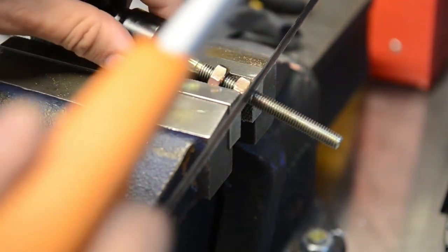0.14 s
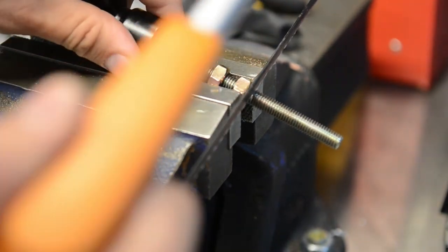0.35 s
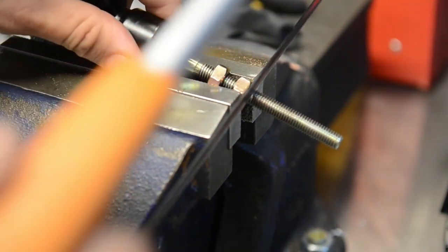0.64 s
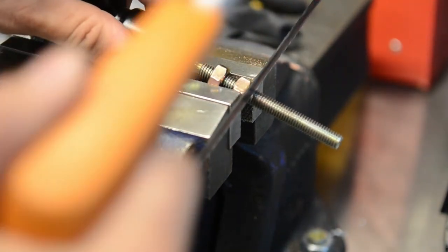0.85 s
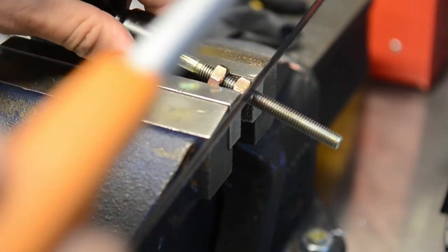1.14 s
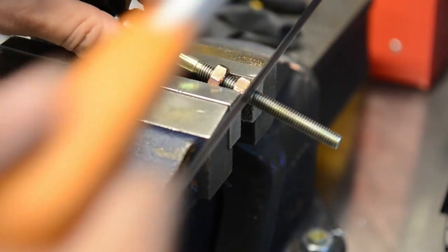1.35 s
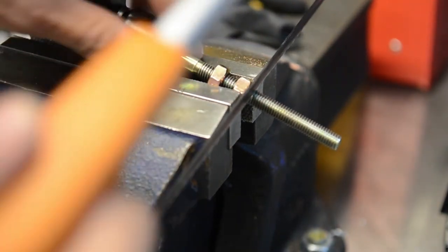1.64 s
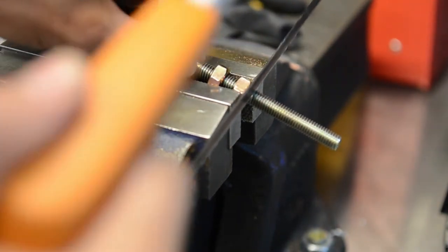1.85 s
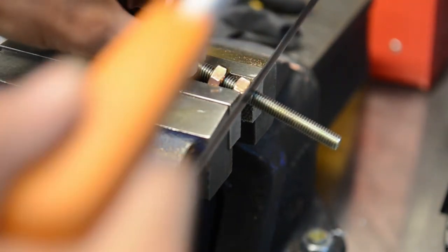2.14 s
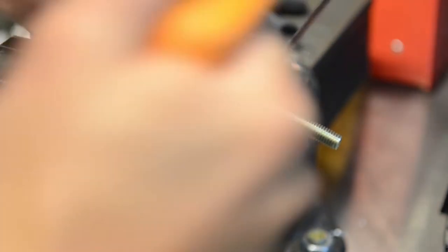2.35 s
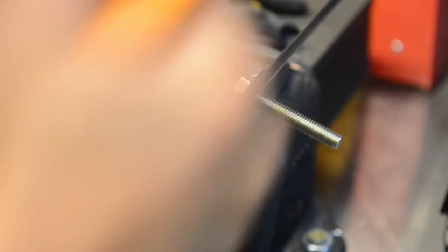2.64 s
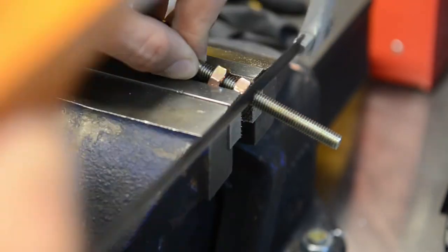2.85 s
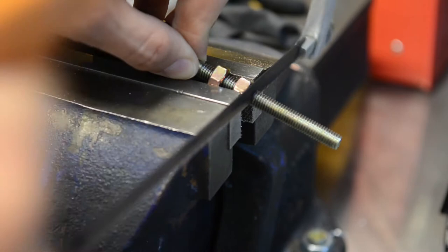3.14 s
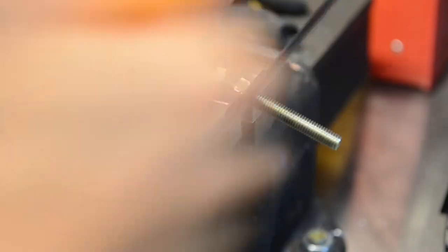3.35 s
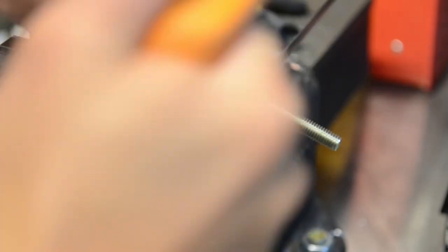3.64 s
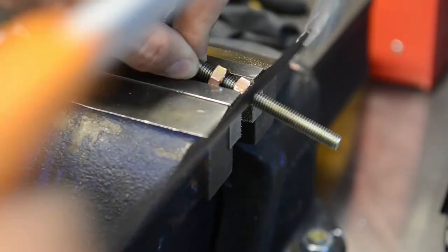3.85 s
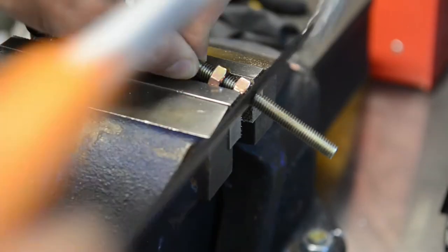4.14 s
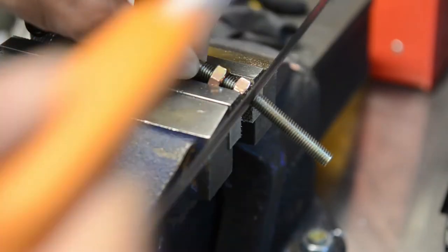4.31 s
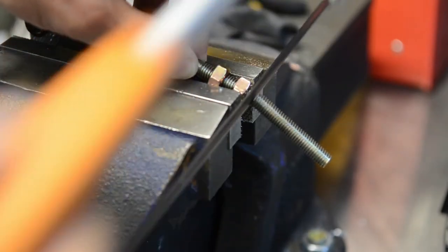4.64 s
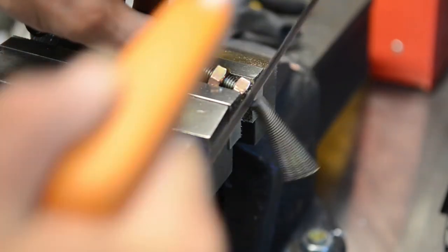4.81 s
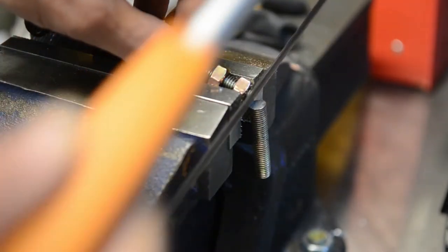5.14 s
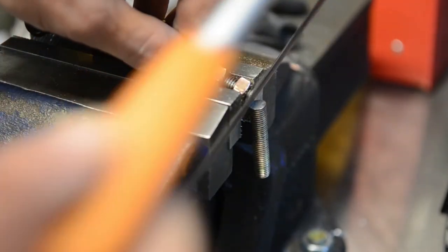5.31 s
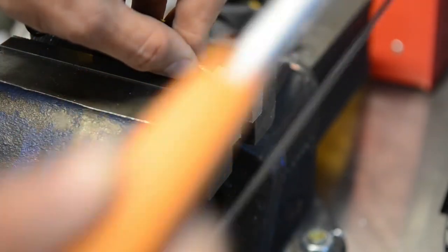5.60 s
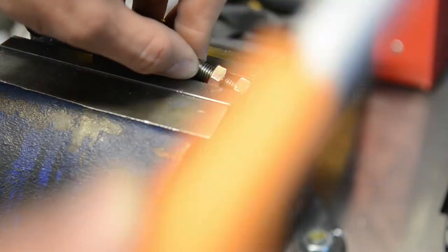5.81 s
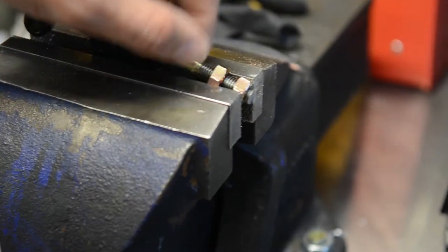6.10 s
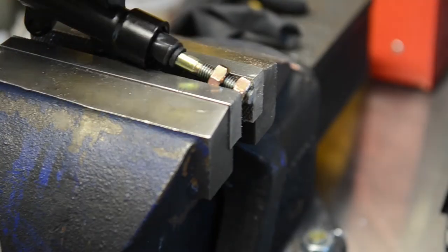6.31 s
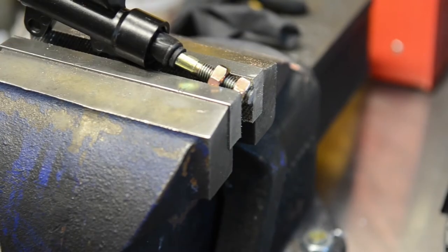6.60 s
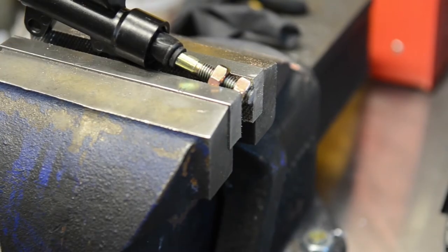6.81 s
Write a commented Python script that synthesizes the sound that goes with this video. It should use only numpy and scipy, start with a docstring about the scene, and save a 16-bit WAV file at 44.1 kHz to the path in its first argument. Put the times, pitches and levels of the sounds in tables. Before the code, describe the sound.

Quick, quiet hacksaw strokes turn into long, loud, squawking rasps through a steel rod, then a skid, a clank and dull knocks in a workshop.

```python
"""A hacksaw rasps through a threaded steel rod in a bench vise, over still air: sped-up strokes an octave
higher and quieter, with one small tick amid them, then longer, louder ones. Each stroke is noise and tooth
ticks shaped by the blade's tones, with short squawks and a bench rumble. The blade skids free as ringing
noise; the cut end tumbles with a thin high warbling tone and knocks. The saw clanks on the vise with fading
tones, small ticks settle, and dull knocks follow further off, echoing in the hard-walled workshop."""
import sys
import numpy as np
from scipy import signal
from scipy.fft import rfft, irfft, next_fast_len
from scipy.io import wavfile
from scipy.ndimage import uniform_filter1d

SR = 44100
rng = np.random.default_rng(int(sys.argv[2]) if len(sys.argv) > 2 else 0)


def transcribe(u):
    """Save the signal u as a 16-bit wav file named by the first command-line argument.

    u: samples, shape (n,) or (channels, n), limited to [-1, 1]; the rate is SR.
    q: integer samples, one column per channel.
    """
    v = np.clip(np.atleast_2d(u).T, -1, 1)
    q = np.round(v * 32767).astype(np.int16)
    wavfile.write(sys.argv[1], SR, q)


N = 306936  # samples in the scene
HZ = np.fft.rfftfreq(next_fast_len(N + SR), 1 / SR)  # pitches at which filters are worked out

# still air of the shop: (pitch [Hz], relative strength [dB])
AIR_SHAPE = [(60, -40), (100, -3.5), (160, -15.5), (270, -14.5), (430, -15.5), (650, -14), (1740, -18),
             (4000, -32.5), (12000, -49), (16000, -84.5)]
AIR_DB = -60.5
# how each pitch dies away in the workshop: (pitch [Hz], time to fall by 60 dB [s])
ROOM_FADES = [(150, 0.4), (600, 0.37), (1700, 0.35), (4600, 0.3), (9000, .28), (12000, 0.26),
              (15000, 0.066)]

# saw strokes, pushes and pulls in turn: (turn time [s], level at the crest before unevenness [dB])
STROKES = [(0.025, -54), (0.113, -51), (0.194, -49.5), (0.29, -46), (0.37, -42), (0.457, -52), (0.535, -46),
           (0.626, -41.5), (0.708, -41.5), (0.795, -40.5), (0.872, -38.5), (0.962, -40), (1.046, -37.5),
           (1.134, -31.5), (1.227, -32.5), (1.309, -34), (1.397, -40.5), (1.492, -46.5), (1.548, -45),
           (1.632, -53.5), (1.7, -46.5), (1.778, -43), (1.861, -41.5), (1.936, -39.5), (2.011, -40.5),
           (2.098, -41.5), (2.174, -42), (2.234, -27.5), (2.347, -25), (2.519, -28.5), (2.681, -24.5),
           (2.85, -28.5), (2.998, -22), (3.168, -27.5), (3.311, -25), (3.48, -26), (3.633, -23.5),
           (3.809, -26.5), (3.941, -23), (4.105, -31), (4.254, -34), (4.408, -38), (4.55, -33),
           (4.677, -35.5), (4.822, -33), (4.966, -39), (5.1, -41), (5.229, -44.5), (5.354, -50.5),
           (5.445, -61)]
LONG_FROM_S, SAW_ENDS_S = 2.233, 5.49
# strokes one way, then the other: (crest as share of the stroke [0-1], chips against the crest [dB],
# teeth passing at full speed [Hz], extra bench rumble [dB], extra level at the turn [dB])
QUICK_WAYS = [(.55, -0.3, 2100, -1.5, 1.5), (0.3, -1.5, 2300, 1, 2)]
LONG_WAYS = [(.45, -4, 1443, 1.2, 1.2), (.55, -8.5, 876.1, -0.64, -1.2)]
# what still sounds while the blade turns round: (time [s], level [dB])
TURN_LEVELS = [(0, -59), (.37, -57), (.457, -48.5), (.535, -66), (.63, -53), (1, -47), (1.3, -40.5),
               (1.68, -56), (1.8, -51), (2.2, -47), (2.234, -28.5), (2.35, -38), (3.5, -36), (4.1, -35),
               (4.4, -43.5), (4.8, -41.5), (5.23, -51), (5.4, -38)]
# sharp starts and bumps within strokes: (time [s], brief change in level [dB])
BUMPS = [(0.407, 6), (.477, 14), (.57, 3), (.753, 6), (1.422, 7), (1.72, 2.5), (1.79, 4), (1.875, -2),
         (3.202, 6.5), (4.132, 4), (4.157, 1)]
# how gritty the cut is as it deepens: (time [s], added to the chips [dB])
GRITTINESS = [(0, -6), (.4, -3), (.8, 0.5), (1.5, -2), (1.75, 0.5), (2.22, 2.5), (2.25, 1.5), (3, 1),
              (4.3, -.5), (5.3, 0.5), (5.4, 2.5)]
# level of the bench rumble: (time [s], level [dB])
RUMBLE_LEVELS = [(0, -55.5), (.44, -49.5), (.58, -59), (.66, -48), (1, -49), (1.25, -46.5), (2.22, -53),
                 (2.28, -37), (2.6, -31.5), (3.1, -38), (3.9, -31.5), (4.3, -38.5), (4.6, -54), (4.8, -46),
                 (5.15, -54.5), (5.45, -52.5)]
# tones of blade and frame, before a pitch factor for each kind of stroke:
# (pitch [Hz], width [Hz], strength in long strokes [dB], strength in quick strokes [dB])
BLADE_MODES = [(870, 45, 6, 6), (1068, 25, 5, 2), (1240, 25, 1, 3), (1442, 30, -1, -4), (1750, 60, -1, -2),
               (1910, 45, 4, -2), (2115, 30, 5, -2), (2790, 80, -3, 0), (2965, 50, 0, -2),
               (3990, 45, 0, -4)]
# broad rasp between those tones: (pitch [Hz], relative power per hertz [dB])
QUICK_BODY = [(210, -37), (350, 0), (610, -12), (754, -4), (1230, -3.5), (1740, 3), (1960, -1), (2480, -1),
              (3130, -5.5), (4140, -13), (4570, -7.5), (5000, -29), (6500, -50), (11000, -120)]
LONG_BODY = [(210, -57), (350, -15.5), (667, -7), (872, 1), (1080, 4.5), (1160, -2.5), (1350, -4),
             (1720, -0.5), (2100, 3.5), (2370, -5.5), (2770, -0.5), (3170, -9.5), (5000, -22),
             (6500, -56.5), (11000, -120)]
# hiss of chips tearing off: (pitch [Hz], relative power per hertz [dB])
QUICK_GRIT = [(1760, -30), (3000, -8), (3130, -61), (3500, -2), (4140, 1), (4630, -14.5), (5600, 6),
              (6170, -5.5), (6390, -10.5), (8700, -11), (11300, -22), (15000, -15), (16000, -24)]
LONG_GRIT = [(1760, -50), (3000, 0), (3170, -5), (4110, -6.5), (5000, -8.5), (5400, -14), (6670, -8.5),
             (7510, -8.5), (9460, -18.5), (13500, -28.5), (16000, -40)]
# vise and bench shaking: (pitch [Hz], relative power per hertz [dB])
QUICK_RUMBLE = [(15, -71), (25, -39), (48, -24), (119, -1), (208, 1.5), (253, -7), (354, -3.5), (617, -9.5),
                (700, -6.5), (910, -8), (1540, -120)]
LONG_RUMBLE = [(47, -33), (80, -1), (134, -5), (171, 4), (200, -1), (306, -5), (371, -1.5), (568, -5.5),
               (700, -4), (910, 3.5), (1540, -120)]

# loud chatter, teeth in step with one tone of the blade:
# (time [s], length [s], pitch [Hz], peak level before roughness [dB])
SQUAWKS = [(0.331, 0.017, 2496, -43.5), (0.73, 0.022, 1760, -53), (0.824, 0.0099, 2530, -36.5),
           (1.013, 0.017, 2680, -39.5), (1.086, 0.02, 1650, -38), (1.256, 0.032, 1740, -30),
           (1.343, 0.022, 1993, -35.5), (1.344, 0.041, 1724, -41), (1.441, 0.015, 1670, -47),
           (1.741, 0.028, 1766, -47), (1.795, 0.024, 1790, -36.5), (1.969, 0.02, 1767, -44),
           (2.07, 0.012, 2120, -34.5), (2.136, 0.041, 1770, -46), (2.253, 0.027, 840, -20.5),
           (2.32, 0.04, 828, -26.5), (2.428, 0.03, 2060, -23), (2.451, 0.026, 880, -17.5),
           (2.568, 0.016, 904, -18.5), (2.78, 0.028, 860, -17.5), (2.922, 0.013, 1460, -20),
           (2.938, 0.013, 1085, -22.5), (3.105, 0.021, 874, -14), (3.206, 0.014, 880, -21),
           (3.245, 0.037, 1486, -28), (3.41, 0.033, 880, -22.5), (3.561, 0.013, 1436, -11.5),
           (3.71, 0.019, 1061, -21.5), (3.743, 0.019, 862, -20), (3.747, 0.027, 1908, -21.5),
           (3.879, 0.013, 1423, -16), (3.901, 0.019, 1098, -16), (3.997, 0.038, 971, -26),
           (4.021, 0.037, 880, -23.5), (4.163, 0.025, 951.4, -22), (4.306, 0.016, 886, -29),
           (4.451, 0.021, 984, -38.5), (4.624, 0.043, 1910, -37.5), (4.699, 0.0069, 944, -39),
           (4.901, 0.041, 1850, -43), (5.01, 0.015, 930, -41.5), (5.129, 0.037, 1250, -43.5)]
FAINT_DB, FAINT_S = -3, .028  # faint chatter: dB against the stroke's crest, length before chance

# small ticks, one amid the quick strokes, the rest as things settle:
# (time [s], level [dB], centre pitch [Hz], room against the click [dB])
TICKS = [(1.693, -44, 10000, 3), (5.994, -45, 9000, 28), (6.122, -52, 8060, 18), (6.149, -48, 8000, 15),
         (6.248, -41, 1140, 11), (6.35, -61, 8920, 8)]

# sway of the bench: (time [s], level before the dip [dB])
SWAY_LEVELS = [(2.241, -55.5), (2.6, -41), (2.95, -44.5), (3.25, -46), (3.6, -53), (3.95, -43),
               (4.4, -55.5), (5, -50.5), (5.49, -61), (5.75, -76.5)]
SWAY_DIP_DB = -10

# the blade out of the cut: (pitch [Hz], width [Hz], strength [dB])
FREE_BLADE_MODES = [(1385, 50, -5.5), (2100, 29, 5.5), (2490, 40, -5), (2970, 33, -2), (3260, 80, -8),
                    (3480, 74, -15), (4300, 179, -16), (5390, 43, -14), (6260, 29, -9), (6660, 62, -15),
                    (6970, 28, -14), (7550, 29, -11), (8300, 230, -23), (9100, 65, -19), (9400, 32, -18.5),
                    (10800, 66, -24)]
# push on the skidding blade: (time [s], level before flicker [dB])
SKID_PUSH = [(5.345, -71), (5.36, -39.5), (5.4, -36), (5.415, -39), (5.43, -38.5), (5.445, -43),
             (5.455, -36), (5.49, -62)]

# ring of the tumbling cut end, split by its spin:
# (time [s], level before flutter [dB], average split each way [Hz])
END_RING = [(5.43, -45, 22), (5.51, -51, 28), (5.63, -43.5, 28), (5.66, -53, 43), (5.861, -59, 137),
            (5.9, -71, 150), (5.985, -56, 230), (6.0, -38, 121), (6.04, -51, 100), (6.124, -40, 25.9),
            (6.16, -57, 21), (6.18, -48, 22), (6.37, -80, 14.6), (6.474, -67, 11), (6.55, -92, 12)]
RING_HZ = 12742

# knocks of the cut end, then those further off: (time [s], relative level [dB], relative treble [dB],
# relative bass [dB], favoured pitch [Hz], relative ring [dB])
CUT_KNOCKS = [(5.4923, -8, -17.5, -38.5, 1180, -10), (5.5215, -29, 2.5, -33, 2220, -19)]
FAR_KNOCKS = [(6.5606, -3.5, -33, -16.5, 1624, -16), (6.5675, -17.5, -37, -23, 900, -19),
              (6.5937, -22.5, -18.5, 0, 1220, -20.5), (6.602, -40, -36, -19, 1230, -14),
              (6.639, -17, -34, -15, 1230, -21), (6.7963, -22.5, -19.5, 6.5, 1370, -21),
              (6.8307, -8, -38, -2, 1480, -11.5), (6.834, -12.5, -47, -21, 584, -11.5),
              (6.842, -29, -42, 1, 1300, -7.5), (6.849, -32, -38, -9, 264, -11.5),
              (6.874, -14, -26.5, 0, 1490, -9.5), (6.899, -16.5, -41, -19, 710, -23),
              (6.93, -18.5, -28.5, -12, 1240, -23)]
# tones of what is struck: (pitch [Hz])
CUT_MODES_HZ = [1190, 2100]
FAR_MODES_HZ = [279, 570, 720, 900, 1216, 1320, 1495, 1620]
# lower and upper edges of each kind of click
CUT_LOW_HZ, CUT_HIGH_HZ = 690, 2850
FAR_LOW_HZ, FAR_HIGH_HZ = 413, 1985
BOOM_HZ, BOOM_T60_S = 91.6, 0.57
SHOULDER_HZ, SHOULDER_DB = 3970, -28  # a weak upper step of the click
FAVOUR_OCTAVES, CRACK_DB = 0.13, 11  # reach of the favoured pitch; crack over the treble of the blow

# saw frame on the vise, the snap and the long ring:
# (pitch [Hz], starting strength [dB], time to fall by 60 dB [s])
FRAME_MODES = [(854, 6.5, 0.0057), (1130, -15, 0.025), (1800, -11.5, 0.026), (2540, -6, 0.013),
               (3235, 5.5, 0.011), (4100, -12.5, 0.013), (5580, -18, .004), (7130, -22.5, .005),
               (8400, -23, .004), (9800, -7.5, 0.0015), (11500, -15.5, 0.0029), (14840, -29, .005),
               (1075, -47, 1.38), (1770, -51, 1), (2660, -53.5, 1.2), (2826, -49.5, 0.75),
               (3210, -43, 0.42), (3330, -47.5, 1.27), (168, -34, 0.27), (216, -35.5, 0.32),
               (272, -36, 0.25), (362, -25.5, 0.11), (107, -50.5, 1.1), (58.3, -48, 1.3)]
CLANK_S, CLANK_DB = 5.9188, 0.5

EDGE_HZ, OFFSET = 16280, .0006  # upper band limit; steady shift of the waveform


def gain_of(db):
    """Turns decibels into a plain multiplier."""
    return 10 ** (np.asarray(db) / 20)


def evened(x):
    """Scales to an average (rms) strength of 1."""
    return x / np.sqrt(np.mean(abs(x) ** 2) + 1e-20)


def read(points, hz):
    """Reads between the points of a table, along log frequency."""
    f, value = np.transpose(points)
    return np.interp(np.log(hz + 1), np.log(f + 1), value)


def over_time(points, t):
    """Reads between the points of a (time, value) table."""
    return np.interp(t, *np.transpose(points))


def colour(x, response):
    """Filters by a response given on HZ, scaled to unit power."""
    return irfft(rfft(x, 2 * len(HZ) - 2) * evened(response))[:N]


def mode(hz, width):
    """Filter of one ringing tone, with peak gain 1: the narrower, the longer it rings."""
    return 1 / (1 + 2j * (HZ - hz) / width)


def wander(seconds):
    """Smooth chance of rms 1 that changes within the given time."""
    size = max(round(seconds * SR), 2)
    once = uniform_filter1d(rng.standard_normal(N), size)
    return evened(uniform_filter1d(once, size))


def placed(s, sound):
    """Sets a sound at time s in silence."""
    return np.append(np.zeros(round(s * SR)), np.append(sound, np.zeros(N)))[:N]


def patchy(x, depth_db, frames, bins):
    """Uneven noise: chance patches of louder and softer over time and pitch."""
    z = signal.stft(x, nperseg=1024, noverlap=768)[2]
    field = uniform_filter1d(rng.standard_normal(z.shape), bins, 0)
    field = evened(uniform_filter1d(field, frames, 1))
    gain = gain_of(depth_db * field)
    return signal.istft(z * evened(gain), nperseg=1024, noverlap=768)[1][:N]


def room():
    """Dense reflections, each band dying at its own speed, energy 1."""
    size = 3 * SR // 4
    hz, t, z = signal.stft(rng.standard_normal(size), SR, nperseg=256, noverlap=128)
    fade = gain_of(-60 * t / read(ROOM_FADES, hz)[:, None])
    tail = signal.istft(z * fade, SR, nperseg=256)[1][:size]
    tail *= 1 - np.exp(-np.arange(size) / (0.00027 * SR))  # soft start
    return np.append(tail, np.zeros(SR - size)) / np.linalg.norm(tail)


def still_air():
    """Quiet steady noise for the air of the shop."""
    return gain_of(AIR_DB) * colour(rng.standard_normal(N), gain_of(read(AIR_SHAPE, HZ)))


def bumps():
    """Sudden changes of level that die away within hundredths of a second: dB over time."""
    t = np.arange(1500) / SR
    return sum(placed(s, db * np.exp(-t / 0.0106)) for s, db in BUMPS)


def strokes(rows, start_s, end_s, pitch_factor, column, ways, body, grit, rumble,
            teeth_db, lumps_db, bite, lift, slack_db):
    """Teeth tick past the rod at a rate that follows the blade speed; torn chips hiss, the bench rumbles."""
    turn_s, crest_db = np.transpose(rows)
    share, grit_db, teeth_hz, rumble_db, turn_db = np.resize(ways, (len(rows), 5)).T
    t = np.arange(N) / SR

    # blade motion: still at each turn, fastest at each crest
    length_s = np.minimum(np.diff(turn_s, append=end_s), 1.15 * np.median(np.diff(turn_s)))
    crest_s = turn_s + np.clip(share, .1, .9) * length_s
    knots = np.append(np.ravel([turn_s, crest_s], "F"), end_s)
    travel = np.interp(t, knots, np.arange(len(knots)) / 2)  # one unit a stroke
    speed = abs(np.sin(np.pi * travel))
    now = np.minimum(travel.astype(int), len(rows) - 1)
    live = uniform_filter1d(1. * (t > start_s) * (t < end_s), 40)

    # the teeth lift clear near the turn
    rest_db = np.interp(t, turn_s, turn_db + over_time(TURN_LEVELS, turn_s))
    contact = np.clip((speed - lift) / (1 - lift), 0, 1) ** bite
    level_db = rest_db + (crest_db[now] - rest_db) * contact
    catch = gain_of(lumps_db * wander(0.00787) + bumps())  # the teeth catch unevenly

    # one tick of chance size a tooth, over a scrape
    passed = np.cumsum(teeth_hz[now] * speed ** .35 * (1 + .03 * wander(.01))) / SR
    tooth_passes = np.diff(np.floor(passed), prepend=0)
    teeth = evened(tooth_passes * (1 + 1.35 * rng.standard_normal(N)))
    grain = evened(gain_of(1.37 * wander(0.00038)))  # single chips stand out of the scrape
    scrape = rng.standard_normal(N) * grain + gain_of(teeth_db) * teeth

    modes = sum(abs(gain_of(m[column]) * mode(pitch_factor * m[0], pitch_factor * m[1])) ** 2
                for m in BLADE_MODES)
    ringing = gain_of(read(body, HZ)) * np.sqrt(1 + modes)
    rasp = colour(scrape * catch * gain_of(level_db), ringing)
    rasp = patchy(rasp, depth_db=3.0, frames=5, bins=4) * live

    chips_db = level_db + np.interp(t, crest_s, grit_db) + over_time(GRITTINESS, t)
    chips_db -= slack_db * (1 - contact)  # slow blade, fewer chips
    chips = rng.standard_normal(N) * np.sqrt(catch) * grain * live * gain_of(chips_db)
    chips = colour(chips, gain_of(read(grit, HZ)))
    chips = patchy(chips, depth_db=3.5, frames=6, bins=3) * live

    shake_db = over_time(RUMBLE_LEVELS, t) + np.interp(t, crest_s, rumble_db) + 1.4 * (speed - 1)
    shaking = rng.standard_normal(N) * live * gain_of(shake_db)
    return rasp + chips + colour(shaking, gain_of(read(rumble, HZ)))


def saw():
    """Sped-up strokes ring an octave above the blade table, the long ones after them just below it."""
    quick = [row for row in STROKES if row[0] < LONG_FROM_S]
    early = strokes(quick, 0, LONG_FROM_S, pitch_factor=2, column=3, ways=QUICK_WAYS,
                    body=QUICK_BODY, grit=QUICK_GRIT, rumble=QUICK_RUMBLE,
                    teeth_db=-21.5, lumps_db=0.5, bite=0.59, lift=0.35, slack_db=7.0)
    late = strokes(STROKES[len(quick):], LONG_FROM_S, SAW_ENDS_S, pitch_factor=0.98, column=2,
                   ways=LONG_WAYS, body=LONG_BODY, grit=LONG_GRIT, rumble=LONG_RUMBLE,
                   teeth_db=-8, lumps_db=0.5, bite=0.94, lift=0.038, slack_db=6.0)
    return early + late


def faint_chatter():
    """Picks a chance blade tone for each stroke but the first and last, in rows like SQUAWKS."""
    turn_s, crest_db = np.transpose(STROKES)
    when, which, size = rng.random((len(STROKES), 3)).T
    picked = (which * len(BLADE_MODES) * .7).astype(int)
    octave = np.where(turn_s < LONG_FROM_S, 2 - (which > .5), 1)  # low picks go up in quick strokes
    hz = np.array(BLADE_MODES)[picked, 0] * octave
    s = turn_s + np.gradient(turn_s) * (.3 + .4 * when)
    return list(zip(s, FAINT_S * (.6 + 1.0 * size), hz, crest_db + FAINT_DB))[1:-1]


def squawks():
    """Short unsteady tones that swell fast, sag in pitch as the stroke slows and die with the mode."""
    out, wobble, rough = np.zeros(N), wander(0.017), wander(0.0021)
    for s, length, hz, db in SQUAWKS + faint_chatter():
        at = np.arange(round((s - 2 * length) * SR), round((s + 4 * length) * SR))
        u = (at / SR - s) / length  # time from the peak, in lengths
        swell = np.exp(-(u / np.where(u < 0, .55, 1.05)) ** 2) * gain_of(db + 3.96 * rough[at])
        turns = np.cumsum(hz * (1 - 0.0123 * u + 0.0087 * wobble[at])) / SR
        out[at] += swell * (np.sin(2 * np.pi * turns) + 0.11 * np.sin(4 * np.pi * turns))
    return out + gain_of(-9) * signal.fftconvolve(out, room())[:N]


def ticks():
    """Millisecond clicks of noise, each with its own share of room."""
    out, t, f = np.zeros(N), np.arange(SR) / SR, np.fft.rfftfreq(SR, 1 / SR)
    for s, db, hz, room_db in TICKS:
        click = rng.standard_normal(SR) * np.exp(-t / 0.0013) + gain_of(room_db) * room()
        band = evened(1 / (1 + 1.2j * (f - hz) / hz) ** 2)
        out += placed(s, gain_of(db) * irfft(rfft(click) * band))
    return out


def sway():
    """The bench sways as narrow low noise that swells on every second stroke."""
    t = np.arange(N) / SR
    travel = np.interp(t, np.transpose(STROKES)[0], np.arange(len(STROKES)))
    dip_db = SWAY_DIP_DB * np.sin(np.pi * (travel - .55) / 2) ** 2
    live = (t > SWAY_LEVELS[0][0]) * (t < SWAY_LEVELS[-1][0])
    push = rng.standard_normal(N) * gain_of(over_time(SWAY_LEVELS, t) + dip_db) * live
    return colour(push, mode(63.5, 30) ** 2)


def skid():
    """Scraping noise, partly bare, partly into the narrow modes of the freed blade."""
    t = np.arange(N) / SR
    live = (t > SKID_PUSH[0][0]) * (t < SKID_PUSH[-1][0])
    push = gain_of(over_time(SKID_PUSH, t) + 4.1 * wander(0.0029)) * live * rng.standard_normal(N)
    bare = gain_of(-23) / (1 + 1j * HZ / 7000) ** 2
    modes = sum(gain_of(db) * mode(hz, width) for hz, width, db in FREE_BLADE_MODES)
    return patchy(colour(push, bare + modes), depth_db=3.5, frames=3, bins=12)


def cut_end():
    """One high bar mode; the spin turns it to and from the ear, so it splits the more the faster it turns."""
    s, level_db, split_hz = np.transpose(END_RING)
    t = np.arange(N) / SR
    spin_hz = np.interp(t, s, split_hz)
    spin = np.cumsum(spin_hz * (1 + .3 * wander(.006))) / SR
    split = np.clip(spin_hz / 110, .25, .7)
    warble = 1 - split + split * np.sqrt(2) * np.cos(2 * np.pi * spin)
    warble /= np.hypot(1 - split, split)  # equal strength at any split
    level = gain_of(np.interp(t, s, level_db) + 1.6 * wander(0.013))
    level *= np.clip((t - s[0]) / 0.0026, 0, 1) * (t < s[-1])
    tone = np.sin(2 * np.pi * RING_HZ * t + 0.58 * wander(.012))
    return np.sqrt(2) * level * warble * tone


def knocks(rows, modes_hz, low_hz, high_hz, boom_db):
    """Each blow is a dull click with a low thump, each with a freshly drawn room echo; on the direct path
    a short crack, and the struck part rings for a few cycles over a low boom of the floor."""
    out, t, f = np.zeros(N), np.arange(SR) / SR, np.fft.rfftfreq(SR, 1 / SR) + 1
    low, high = low_hz / (1j * f), 1j * f / high_hz
    boom = np.sin(2 * np.pi * BOOM_HZ * t) * gain_of(-60 * t / BOOM_T60_S) * (1 - np.exp(-t / 0.007))
    low_cut = (1 + 1.7 * low + low ** 2) * (1 + 1.5 * low + low ** 2)
    high_cut = (1 + 1.14 * high + high ** 2) ** 2 * (1 + 1.3 * high + high ** 2)
    shoulder = gain_of(SHOULDER_DB) * (f / SHOULDER_HZ) / (1 + 1j * (f - SHOULDER_HZ) / 1300) ** 2
    for s, db, treble_db, bass_db, favoured_hz, ring_db in rows:
        treble = 1j * gain_of(treble_db + 3.0) * f / (f + 2000) / (1 + (f / 5500) ** 2)
        thump = gain_of(bass_db) * f / (f + 60) / (1 + 1j * (f - 260) / 170) ** 2
        click = 1 / (low_cut * high_cut) + treble + shoulder - thump
        echo = irfft(rfft(room()) * click)
        crack = uniform_filter1d(np.diff(rng.standard_normal(SR + 1)), size=3) * np.exp(-t / 0.0032)
        # tones near the favoured pitch sound strongest
        modes = sum(np.sin(2 * np.pi * hz * t) / (1 + (np.log2(hz / favoured_hz) / FAVOUR_OCTAVES) ** 2)
                    for hz in modes_hz)
        ring = modes * (t / 0.0025) * np.exp(1 - t / 0.0026)
        heard = gain_of(db + 32.5) * echo + gain_of(db + treble_db + CRACK_DB) * crack
        out += placed(s, heard + gain_of(ring_db) * ring + gain_of(db + boom_db) * boom)
    return out


def clank():
    """All modes start with the blow, the lowest swelling slowly; the room answers the bare click, dulled,
    with a thud from the bench."""
    t = np.arange(SR) / SR
    ring = sum(gain_of(db - 60 * t / t60) * np.sin(2 * np.pi * hz * t)
               * (1 - np.exp(-t / 0.015 * (hz / 120) ** 2)) for hz, db, t60 in FRAME_MODES)
    direct = placed(CLANK_S, gain_of(CLANK_DB) * ring * (1 - np.exp(-t / 0.00053)))
    dulled = 1 / (1 + (HZ / 3500) ** 2) + 0.023 / (1 + (HZ / 11000) ** 4) + 1.5 * abs(mode(150, 200)) ** 2
    answer = colour(placed(CLANK_S, room()), dulled)
    thud = placed(CLANK_S, rng.standard_normal(SR) * (t / 0.053) * np.exp(1 - t / 0.045))
    answer += gain_of(-37.5) * colour(thud, mode(200, 170) ** 2)
    return direct + gain_of(-22) * signal.fftconvolve(direct, room())[:N] + gain_of(-3.5) * answer


def scene():
    """Adds every sound into one channel over the still air of the shop."""
    sawing = saw() + squawks() + sway() + skid()
    blows = knocks(CUT_KNOCKS, CUT_MODES_HZ, CUT_LOW_HZ, CUT_HIGH_HZ, boom_db=-51.5)
    blows += knocks(FAR_KNOCKS, FAR_MODES_HZ, FAR_LOW_HZ, FAR_HIGH_HZ, boom_db=-33)
    return (still_air() + sawing + ticks() + cut_end() + blows + clank())[None]


def record(dry):
    """Adds a slight steady offset, flattens peaks beyond full scale, then removes the very top pitches."""
    limit = signal.firwin(511, EDGE_HZ, window=("kaiser", 9), fs=SR)
    return signal.oaconvolve(np.clip(dry + OFFSET, -1, 1), limit[None], "same")


dry = scene()
out = record(dry)
transcribe(out)
```